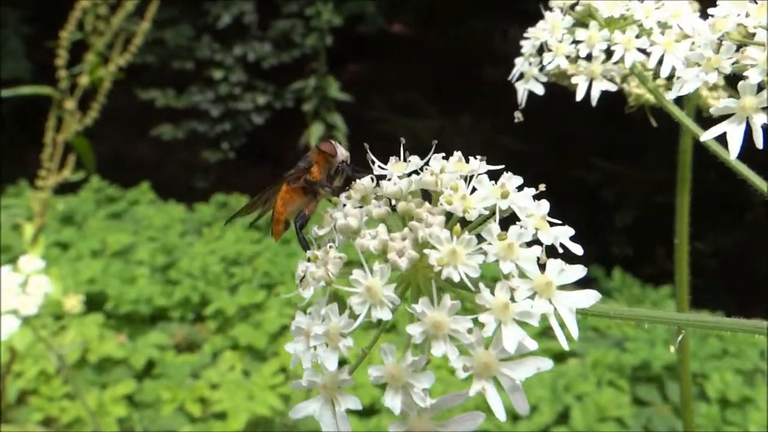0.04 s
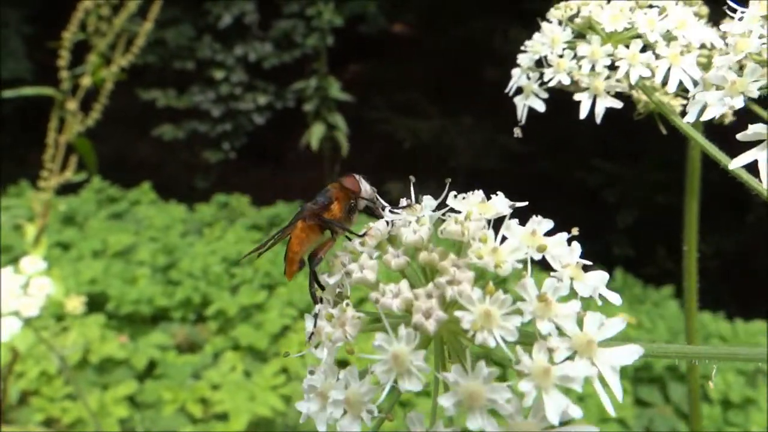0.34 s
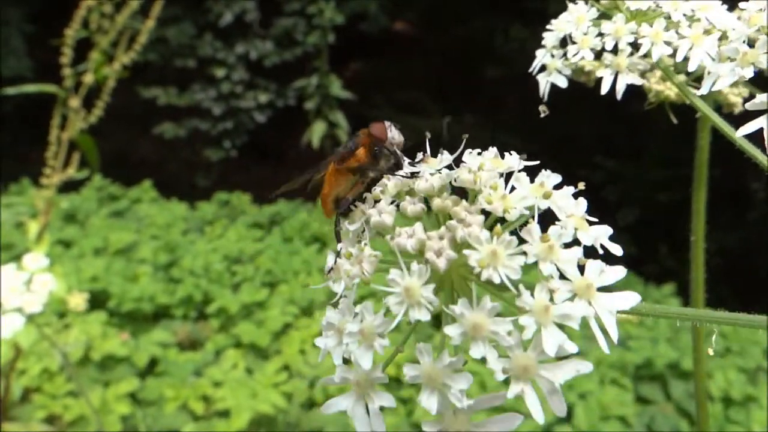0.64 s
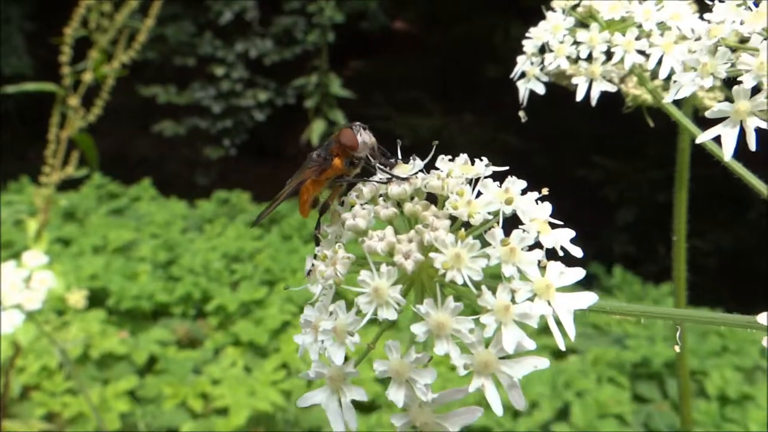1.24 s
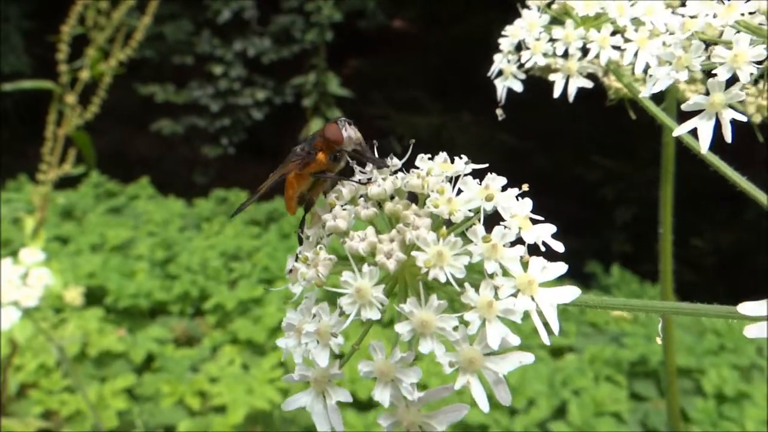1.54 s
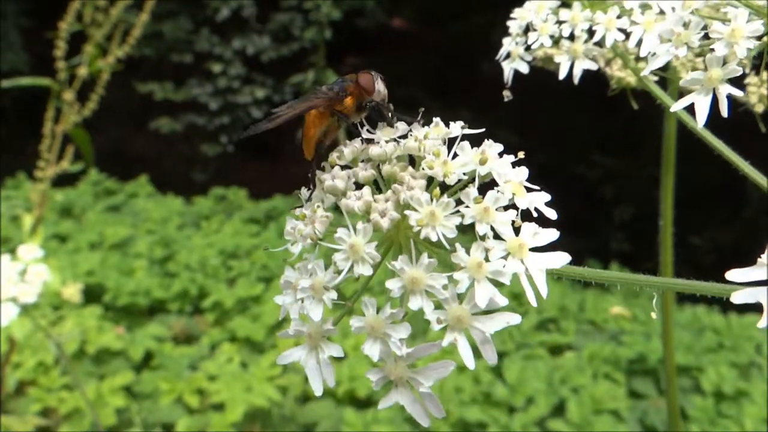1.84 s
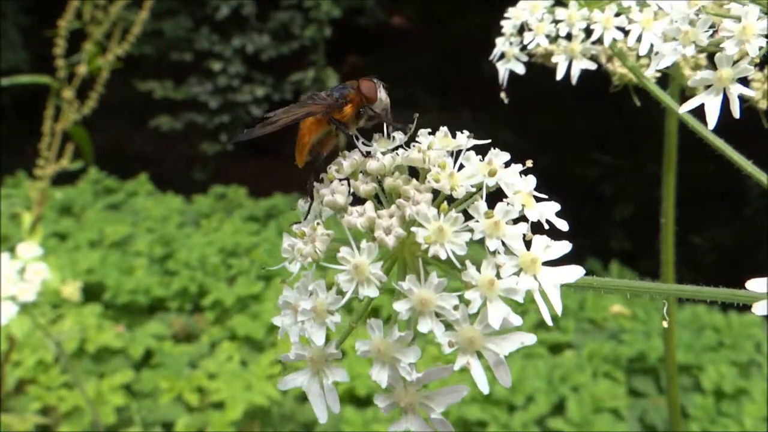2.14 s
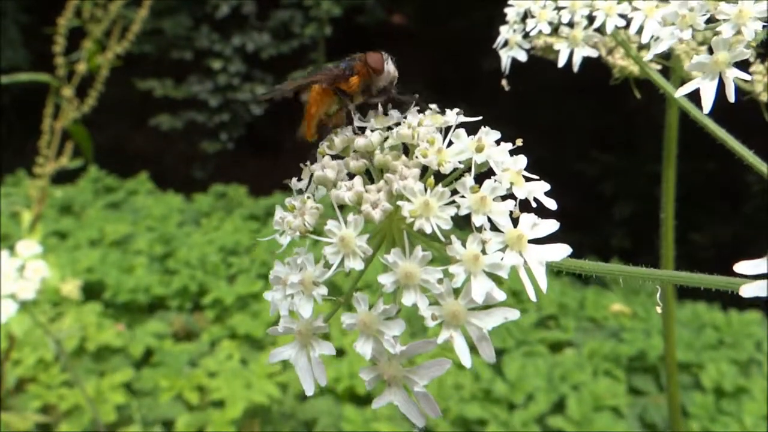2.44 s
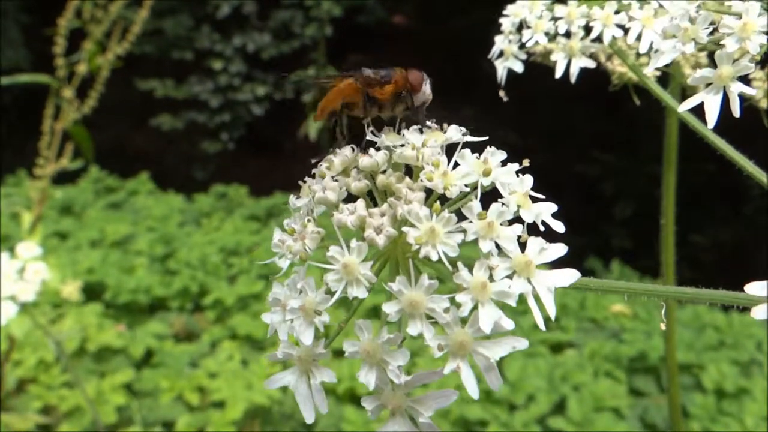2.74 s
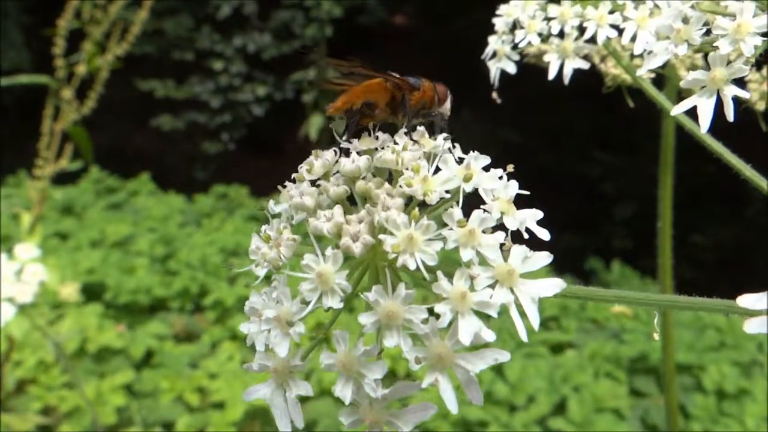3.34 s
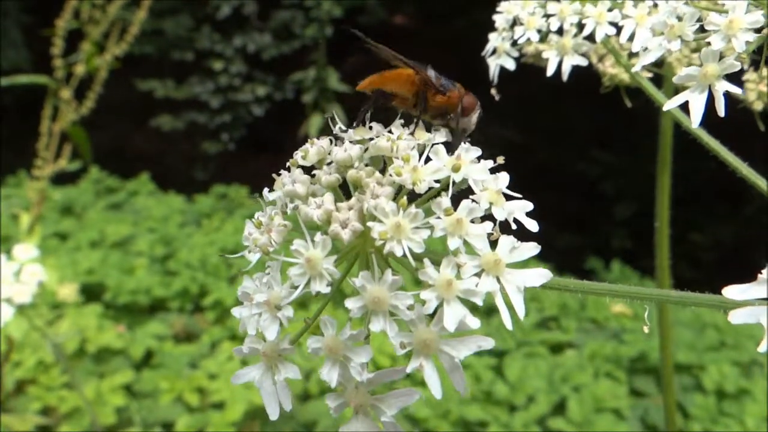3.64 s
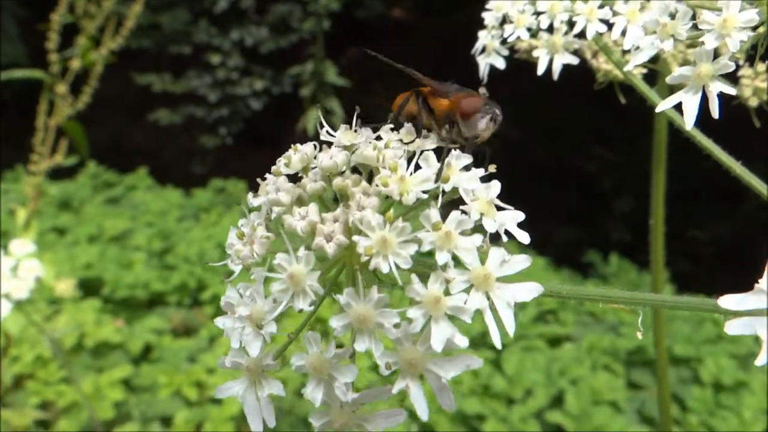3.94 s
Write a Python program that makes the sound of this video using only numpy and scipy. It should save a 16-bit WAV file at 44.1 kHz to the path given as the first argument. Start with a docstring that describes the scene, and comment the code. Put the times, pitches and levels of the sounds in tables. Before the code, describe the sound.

Small birds whistle, chip and trill in trees, after a fly briefly buzzes close by.

```python
"""The edge of a wood, in stereo. Small birds call from the trees to the right of the microphone: thin
high whistles, arched chips, one loud trill and a far song, all gliding tones scattered by trunks and
leaves. At the start a fly passes close to the microphone, its wingbeats buzzing and rustling.
Under it lie a faint, distant outdoor hush and a low rumble that swells in the second half."""
import sys
import numpy as np
from scipy import signal
from scipy.fft import rfft, irfft
from scipy.io import wavfile
from scipy.ndimage import uniform_filter1d

SR = 44100
rng = np.random.default_rng(int(sys.argv[2]) if len(sys.argv) > 2 else 0)


def digitize_waveform(pressure):
    """Quantize a signal to 16-bit integers and store it at the path in sys.argv[1].

    Rows of a 2-D input are taken as channels; values are limited to [-1, 1].
    """
    field = np.atleast_2d(pressure).T
    bounded = np.clip(field, -1, 1)
    quanta = np.round(bounded * 32767).astype(np.int16)
    wavfile.write(sys.argv[1], SR, quanta)


N = 176400
T = np.arange(N) / SR
BIN_HZ = np.arange(N // 2 + 1) * SR / N
SIDE = np.array([[1], [-1]])   # adds on the left, subtracts on the right


def from_db(db):
    """Decibels to gain."""
    return 10 ** (np.asarray(db) / 20)


def rms_one(x):
    """Scale to rms 1."""
    return x / np.sqrt(np.mean(x ** 2) + 1e-20)


def in_time(rows):
    """Each column of a table over time, read at every sample."""
    times, *columns = np.transpose(rows)
    return [np.interp(T, times, column) for column in columns]


def per_bin(points):
    """A table over log frequency, read at every bin."""
    hz, value = np.transpose(points)
    return np.interp(np.log(BIN_HZ + 1e-3), np.log(hz), value)


def noise(spectrum):
    """Noise of a given colour, rolled off below 28 Hz, rms 1."""
    low_cut = BIN_HZ ** 4 / (BIN_HZ ** 4 + 28 ** 4)
    white = rfft(rng.standard_normal(N))
    return rms_one(irfft(white * from_db(per_bin(spectrum)) * low_cut, N))


def drift(rate_hz):
    """Smooth random wandering, spread 1."""
    step, settle = 40, 2000
    pole = np.exp(-2 * np.pi * rate_hz * step / SR)
    white = rng.standard_normal(N // step + settle + 2)
    slow = signal.lfilter([1], [1, -2 * pole, pole * pole], white)[settle:]
    return np.interp(np.arange(N) / step, np.arange(len(slow)), rms_one(slow))


def phase(hz):
    """Running phase of a frequency curve."""
    return 2 * np.pi * np.cumsum(hz) / SR


def tone(hz):
    """A gliding sine of rms 1."""
    return np.sqrt(2) * np.sin(phase(hz))


def span(start, length):
    """The samples of a note and its progress from 0 to 1."""
    i = np.arange(max(int(start * SR), 0), min(int((start + length) * SR), N))
    return i, np.clip((i / SR - start) / length, 0, 1)


def swell(progress, rise, fall):
    """Soft attack, hold and soft release; rise and fall are shares of the note's length."""
    attack = np.sin(np.pi / 2 * np.clip(progress / rise, 0, 1))
    release = np.sin(np.pi / 2 * np.clip((1 - progress) / fall, 0, 1))
    return attack * release


def hush():
    """Steady far-off outdoor noise, widest across the stereo image in the middle range."""
    # colour of the hush: f/Hz, relative level/dB
    spectrum = [(25, -9), (40, -6.5), (75, -2.5), (227, 1), (350, -10.5), (440, -11.5), (590, -16.5),
                (1020, -16), (1250, -21), (2300, -25.5), (4200, -28.5), (7300, -30), (9500, -33.5),
                (15500, -37.5)]
    # likeness of the two channels: f/Hz, left-right correlation
    likeness = [(60, 0.96), (130, 0.95), (240, 0.79), (480, 0.04), (950, 0.045), (1900, 0.065),
                (3800, 0.47), (7500, 0.95), (14000, 1)]
    alike = per_bin(likeness)
    width = np.sqrt((1 - alike) / (1.001 + alike))
    mid = noise(spectrum)
    side = irfft(rfft(noise(spectrum)) * width, N)
    return from_db(-55) * (mid + side * SIDE)


def rumble():
    """A low, uneven rumble with a boomy resonance, alike in both channels."""
    # swells of the rumble: t/s, low band level/dB, upper band level/dB
    swells = [(0, -65.5, -65), (1.75, -58.5, -61), (1.86, -50.5, -50.5), (2.05, -55, -60.5),
              (2.18, -48, -68), (2.3, -58, -54), (2.46, -44, -45), (2.51, -51, -51), (2.68, -47.5, -49),
              (2.82, -45, -45.5), (2.92, -53, -54.5), (3.06, -51, -54), (3.14, -66, -56.5),
              (3.31, -44.5, -49.5), (3.41, -52, -64.5), (3.55, -48.5, -54.5), (3.8, -54, -52),
              (4, -55, -62.5)]
    # colour of the low band: f/Hz, relative level/dB
    low_band = [(30, -16.5), (70, -20), (110, -7.5), (130, -8), (149, 2.5), (172, -9), (210, -10.5),
                (300, -25.5), (600, -74)]
    # colour of the upper band: f/Hz, relative level/dB
    upper_band = [(100, -25), (170, -3.5), (215, -1), (290, 6.5), (360, -9), (440, -4.5), (560, -19.5),
                  (1000, -29), (2500, -64)]
    low_db, upper_db = in_time(swells)
    return from_db(low_db) * noise(low_band) + from_db(upper_db) * noise(upper_band)


def booms():
    """Wavering low tones rise briefly out of the rumble."""
    # low booms: start t/s, length/s, f/Hz, level/dB
    notes = [(2.42, 0.068, 148, -40.5), (3.26, 0.14, 148.1, -40.5), (3.782, 0.27, 222.6, -48.5)]
    out, flutter_db, waver_hz = np.zeros(N), 2 * drift(27), 7 * drift(13.6)
    for start, length, hz, db in notes:
        i, progress = span(start, length)
        envelope = from_db(db + flutter_db[i]) * swell(progress, rise=0.47, fall=0.93)
        out[i] += envelope * tone(hz + waver_hz[i])
    return out


def wood(call, direct_db, scatter_db):
    """A call reaches the microphone from the right, then as a dying cloud off trunks and leaves."""
    t60_s, build_s, correlation, right_lead_db = 0.52, 0.0014, 0.91, 6
    t = T[:SR]
    mid, side = rng.standard_normal((2, SR)) * (rng.random((2, SR)) < .05)   # sparse reflections
    echoes = np.sqrt(1 + correlation) * mid + np.sqrt(1 - correlation) * side * SIDE
    echoes = echoes * from_db(-60 * t / t60_s) * (1 - np.exp(-t / build_s))
    cloud = signal.fftconvolve(call[None], rms_one(echoes) / np.sqrt(SR), axes=1)[:, :N]
    direct = from_db(direct_db - right_lead_db / 2 * SIDE) * call
    return direct + from_db(scatter_db) * cloud


def far_song():
    """Far off, two runs of arched notes and a faint twitter; sliding upper notes blur into a haze."""
    # note pairs: start t/s, lower f/Hz, lower level/dB, upper f/Hz, upper level/dB
    notes = [(.366, 3615, -60.5, 5330, -63), (.418, 3600, -57.5, 5380, -66), (.472, 3556, -56, 5330, -65),
             (.53, 3330, -65, 4910, -64), (0.591, 3170, -65, 4680, -66), (.67, 2990, -67.5, 4480, -71),
             (2.325, 3250, -70, 4700, -65), (2.372, 3320, -62, 5200, -67), (2.42, 3450, -60.5, 5150, -68),
             (2.472, 3590, -60.5, 5400, -70), (2.525, 3504, -61.5, 5050, -66),
             (2.59, 3310, -62.5, 4900, -68), (2.655, 3090, -62.5, 4690, -64), (2.752, 3220, -65, 4760, -68),
             (3.429, 3770, -71, 4230, -73), (3.77, 3960, -72, 4200, -80), (3.84, 3760, -67.5, 4460, -74),
             (3.91, 4170, -70, 4450, -75)]
    # mix of the lower notes, the second run more distant: t/s, direct level/dB, echo level/dB
    distance = [(.7, -1, -2.5), (2.3, -6, -0.5)]
    hold, drop = 0.64, 0.227   # upper note: share of its length held, share of its pitch lost
    lower, upper, roughness = np.zeros(N), np.zeros(N), 0.0343 * drift(320)
    for start, hz, db, upper_hz, upper_db in notes:
        i, progress = span(start, length=.031)
        arch = 1 + 0.032 * (np.sin(np.pi * progress) - np.pi / 4)
        envelope = from_db(db) * swell(progress, rise=0.11, fall=0.56)
        lower[i] += envelope * tone(hz * (arch + roughness[i]))
        i, progress = span(start + 0.013, length=.042)
        slide = 1 - drop * np.clip((progress - hold) / (1 - hold), 0, 1)
        envelope = from_db(upper_db) * swell(progress, rise=.15, fall=0.17)
        upper[i] += envelope * tone(upper_hz * (slide + roughness[i]))
    direct_db, echo_db = in_time(distance)
    return wood(lower, direct_db, echo_db) + wood(upper, direct_db=-6.5, scatter_db=-4.5)


def fly():
    """A fly close to the microphone: wingbeat harmonics, and a puff of rustle on every beat."""
    # the pass: t/s, wingbeat f/Hz, buzz level/dB
    flight = [(0, 174, -50), (.028, 178.6, -45), (.055, 176, -45.5), (.08, 163.4, -51), (.13, 165, -52),
              (.185, 159.2, -51.5), (.215, 162, -80)]
    # wingbeat spectrum: harmonic number, relative level/dB
    harmonics = [(1, -1), (2, -5), (3, -20), (4, -14.5), (5, -27), (6, -22), (7, -20), (8, -26), (9, -29),
                 (10, -39), (11, -32), (12, -39)]
    # colour of the wing rustle: f/Hz, relative level/dB
    wing_hiss = [(500, 11), (1500, -11.5), (3500, -9.5), (6000, -8), (9000, -4), (11500, -9.5),
                 (15000, -22)]
    stop_s, fade_s, dulling_db_per_s = 0.24, 0.041, 28
    hz, db = in_time(flight)
    beat = phase(hz * (1 + 0.022 * drift(90)))
    buzz = np.zeros(N)
    for k, level_db in harmonics:
        dull_db = dulling_db_per_s * T * (k > 3)   # the high harmonics sink into the rustle
        buzz += from_db(level_db - dull_db) * np.sin(k * beat + rng.uniform(0, 2 * np.pi))
    puffs = np.exp(0.49 * np.cos(beat))
    rustle = noise(wing_hiss) * puffs * from_db(1.9 * drift(80))
    flying = np.clip((stop_s - T) / fade_s, 0, 1)
    return flying * (from_db(db) * rms_one(buzz) + from_db(-55.5) * rms_one(rustle))


def chips():
    """The pitch shoots up, sags to a knee, then plunges; farther birds have more echo."""
    # arched chips: start t/s, rise/s, sag/s, plunge/s, first f/Hz, top f/Hz, knee f/Hz, last f/Hz,
    # top level/dB, knee level/dB, echo gain/dB
    calls = [(0.242, 0.0045, 0.0057, .012, 8300, 9100, 8000, 6860, -62, -60, 7),
             (.268, 0.0089, .010, 0.0069, 4150, 4830, 4350, 3200, -50.5, -54, -0.5),
             (1.696, .010, .034, .014, 5600, 6360, 5180, 2900, -59.5, -63, -3),
             (2.271, 0.0058, 0.0094, .012, 5150, 5350, 5100, 3500, -69, -54, 2),
             (2.896, .018, 0.0027, .008, 6400, 8500, 7800, 5830, -50, -46, 2.5),
             (2.962, .016, .035, .015, 4100, 6976, 5765, 2970, -33, -41.5, -3)]
    out, waver_hz = np.zeros((2, N)), 50 * drift(150)
    for start, rise, sag, plunge, first, top, knee, last, top_db, knee_db, echo_db in calls:
        corners = np.cumsum([0, rise, sag, plunge])
        i, progress = span(start, corners[-1])
        age = progress * corners[-1]
        hz = np.interp(age, corners, [first, top, knee, last])
        hz = uniform_filter1d(hz, size=220, mode="nearest")   # rounded bends
        db = np.interp(age, corners, [top_db - 24, top_db, knee_db, knee_db - 10.5])
        chip = np.zeros(N)
        chip[i] = from_db(db) * swell(progress, rise=0.036, fall=.04) * tone(hz + waver_hz[i])
        out += wood(chip, direct_db=-2.5, scatter_db=echo_db)
    return out


def whistles():
    """Thin, almost pure tones from the trees that bend through three pitches, with a quick warble."""
    # whistles: start t/s, length/s, first f/Hz, middle f/Hz, last f/Hz, level/dB, warble depth/Hz
    calls = [(-.03, 0.052, 7080, 7110, 6990, -53.5, 260), (-.03, 0.079, 8630, 8230, 8090, -56, 504),
             (0.209, 0.11, 8550, 8340, 8280, -54, 303), (0.68, 0.11, 6760, 6785, 7060, -58.5, 40),
             (0.727, 0.19, 6840, 7035, 7000, -57.5, 29.8), (0.865, 0.079, 6830, 6740, 6580, -58, 40),
             (0.87, 0.077, 8320, 8320, 8430, -64.5, 80), (1.09, 0.085, 8040, 8000, 7940, -59.5, 230),
             (1.40, 0.083, 7420, 7970, 8180, -57, 130), (1.454, 0.056, 6750, 7550, 7200, -56, 454),
             (1.479, 0.0497, 5950, 6900, 6430, -54.5, 417), (1.746, 0.064, 9100, 8480, 8100, -66.5, 200),
             (1.764, 0.1, 7110, 8110, 7880, -58.5, 302), (1.836, 0.093, 7150, 6730, 6700, -57.5, 130),
             (1.911, 0.13, 6540, 6920, 7300, -52.5, 130), (1.892, 0.048, 9050, 9240, 9500, -65, 380),
             (1.903, 0.11, 8200, 8450, 8190, -52.5, 220), (2.099, 0.14, 8370, 8550, 8540, -48.5, 159),
             (2.13, .009, 8650, 8650, 8400, -46, 50), (2.149, .16, 7577, 8120, 8060, -44.5, 129),
             (2.542, 0.088, 8560, 8730, 8880, -58.5, 99), (2.55, 0.089, 7150, 7310, 7540, -62, 77),
             (2.671, 0.1, 7580, 7970, 8160, -46.5, 150), (2.905, 0.11, 8320, 8420, 8270, -61.5, 220),
             (3.013, 0.18, 8400, 8320, 8300, -54, 160), (3.202, 0.15, 8360, 8320, 8400, -51, 323),
             (3.367, 0.12, 8440, 8380, 8540, -50.5, 346), (3.512, 0.12, 8610, 8370, 8330, -52.5, 350),
             (3.605, 0.13, 6860, 7270, 7960, -64, 252), (3.701, 0.1, 8070, 7950, 7970, -58.5, 200),
             (3.79, 0.086, 8000, 8140, 8280, -56, 131)]
    warble_hz, random_share = 74.6, 0.468
    out, waver_hz = np.zeros(N), 34.1 * drift(170)
    warble_phase = phase(warble_hz * (1 + 0.1882 * drift(24.66)))
    warble = (1 - random_share) * np.sin(warble_phase) + random_share * drift(234)
    flutter = from_db(1.15 * drift(86))
    for start, length, first, middle, last, db, depth in calls:
        i, progress = span(start, length)
        bend = np.polyfit([0, .5, 1], [first, middle, last], 2)
        hz = np.polyval(bend, progress) + depth * warble[i] + waver_hz[i]
        out[i] += from_db(db) * swell(progress, rise=0.38, fall=0.19) * tone(hz)
    return out * flutter


def branches(call):
    """Echoes off branches close to the trilling bird beat against its sweeping pitch."""
    # branch echoes: delay/s, gain/dB
    echoes = [(.0043, -14), (0.0105, -26), (.027, -17)]
    return call + sum(from_db(db) * np.interp(T - delay, T, call, left=0) for delay, db in echoes)


def trill():
    """The loud bird: a sinking whistle whose pitch jumps up and slides down in quick repeats."""
    # course of the trill: t/s, centre f/Hz, level/dB
    course = [(3.112, 7100, -59), (3.134, 7230, -40.5), (3.14, 7160, -34), (3.175, 6670, -31.5),
              (3.2, 6654, -30), (3.226, 6673, -34.5), (3.25, 6650, -31.5), (3.271, 6730, -41),
              (3.295, 6804, -31.5), (3.319, 6750, -40.5)]
    rate_hz, depth_hz, octave_db = 59, 245, -51
    centre_hz, db = in_time(course)
    start, end = course[0][0], course[-1][0]
    i, progress = span(start, end - start)
    beat = 2 * np.pi * rate_hz * (T[i] - T[i[0]])
    sweep_hz = depth_hz * (np.cos(beat) - 0.27 * np.sin(2 * beat))
    hz = centre_hz[i] + sweep_hz + 35 * drift(280)[i]
    voice = tone(hz) + from_db(octave_db) * tone(2 * hz)
    out = np.zeros(N)
    out[i] = from_db(db[i]) * swell(progress, rise=0.024, fall=0.047) * voice
    return out


def scene():
    """At the microphone: birds in the wood, the fly close by and the background."""
    birds = wood(whistles(), direct_db=-3.0, scatter_db=0.5) + chips()
    birds += wood(branches(trill()), direct_db=-3.0, scatter_db=-6.0) + far_song()
    return birds + fly() + hush() + rumble() + booms()


def record(dry):
    """The treble is cut steeply at the very top."""
    cutoff_hz = 15700
    return signal.sosfilt(signal.ellip(12, .1, 70, cutoff_hz, fs=SR, output="sos"), dry)


dry = scene()
out = record(dry)
digitize_waveform(out)
```